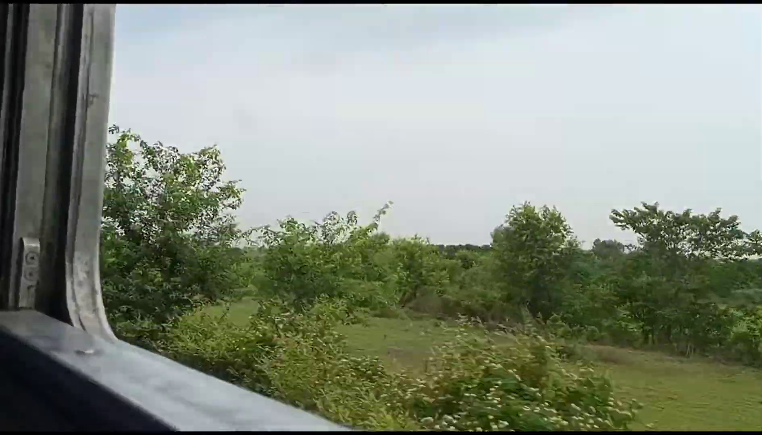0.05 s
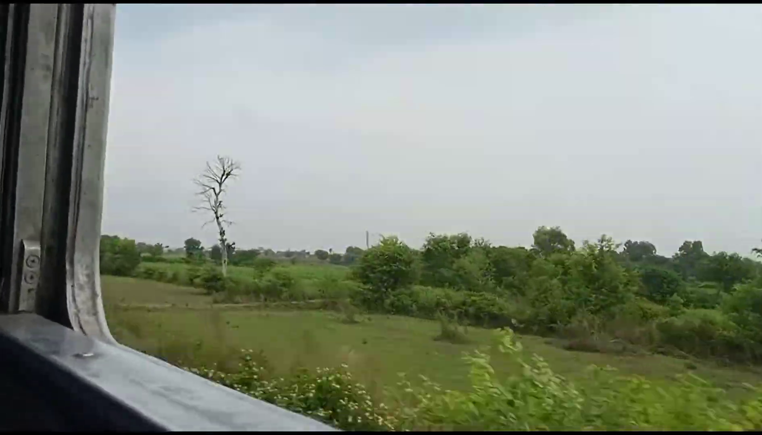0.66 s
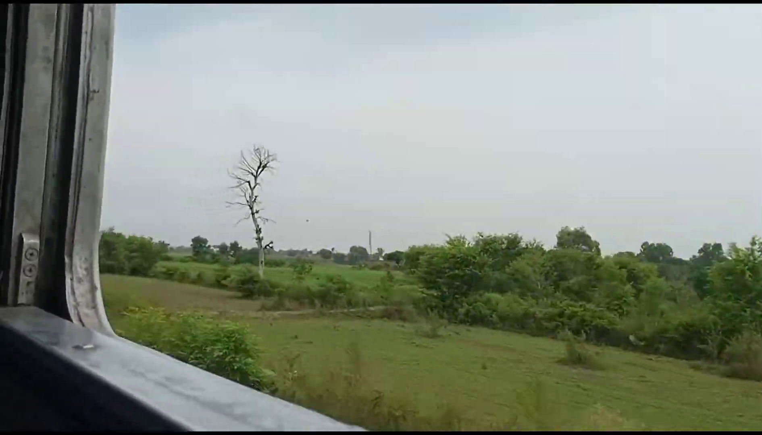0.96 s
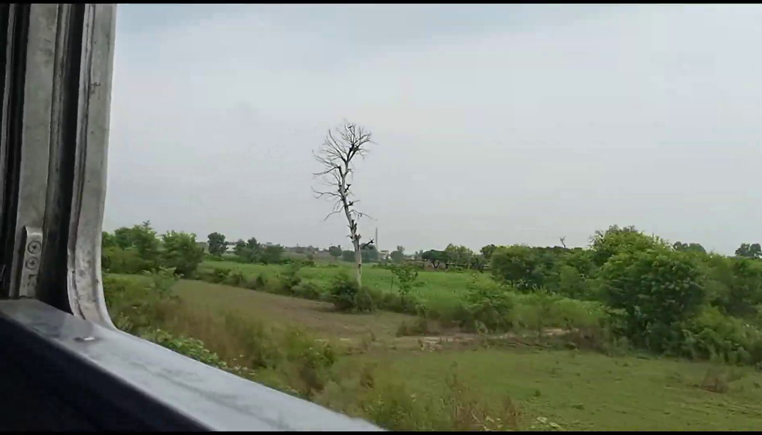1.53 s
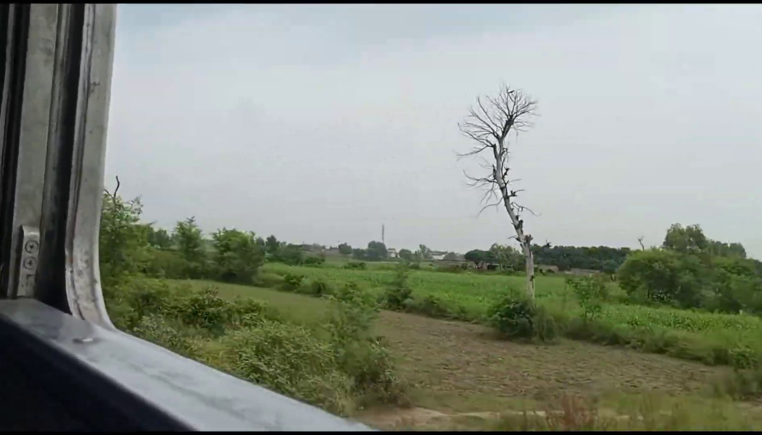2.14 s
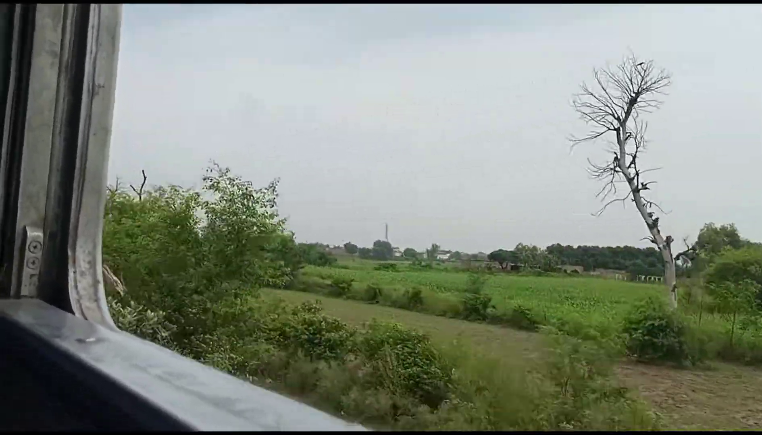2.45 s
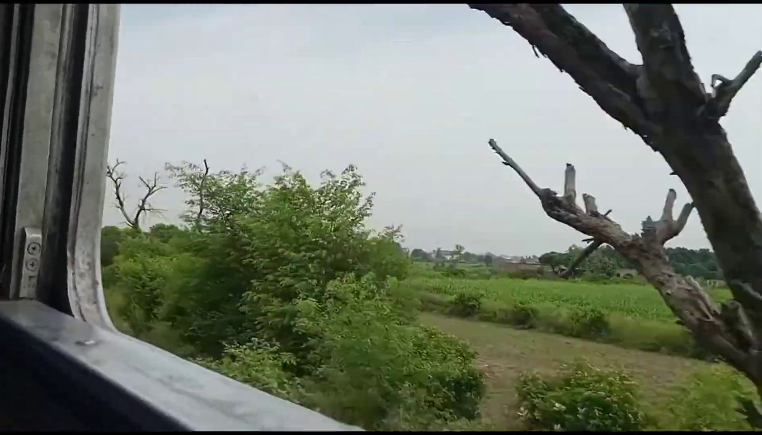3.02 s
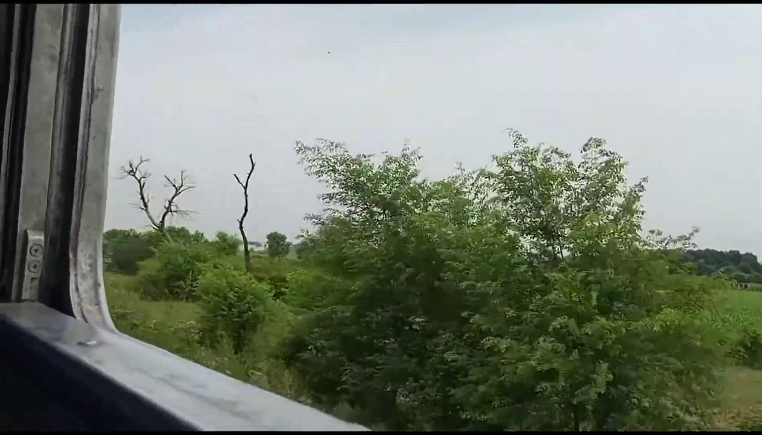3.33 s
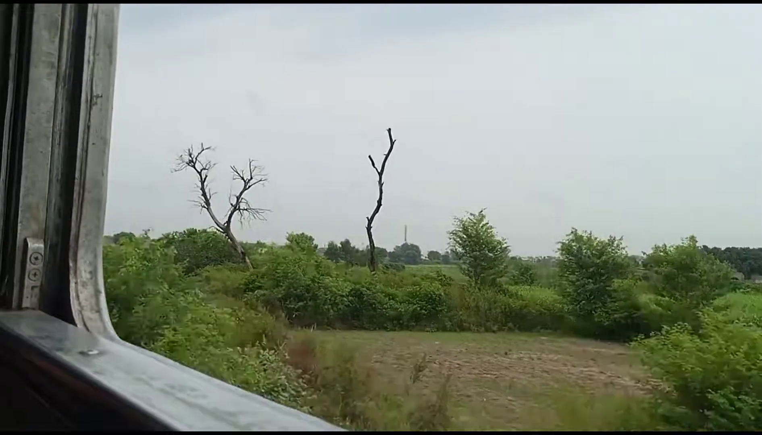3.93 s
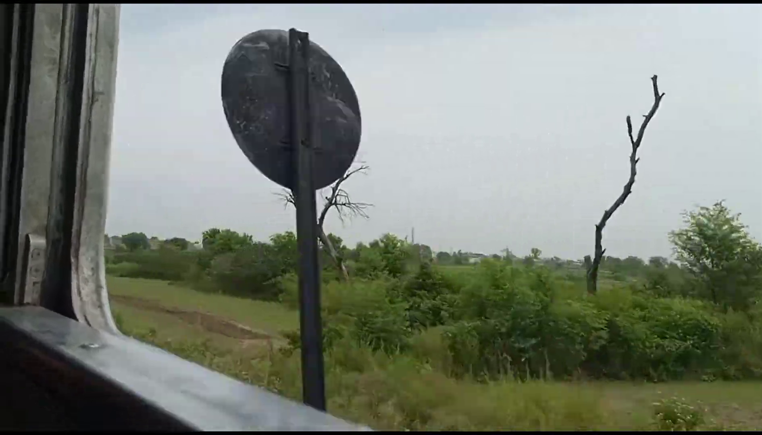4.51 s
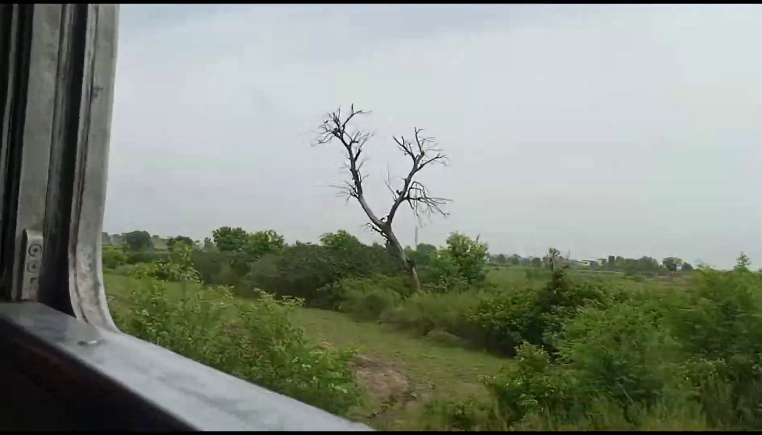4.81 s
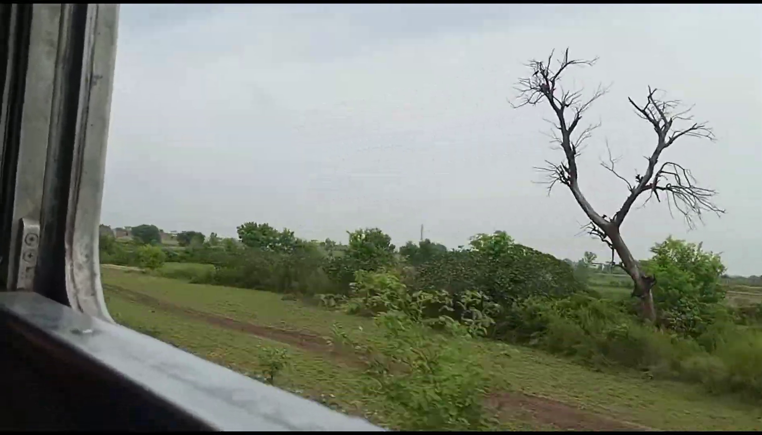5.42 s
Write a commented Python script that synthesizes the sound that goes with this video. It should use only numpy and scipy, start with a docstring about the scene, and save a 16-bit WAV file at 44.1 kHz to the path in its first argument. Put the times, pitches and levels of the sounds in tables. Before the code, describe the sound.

Loud gusty wind buffets the microphone at an open window of a moving train, over carriage rumble and hissing, rattling wheels.

```python
"""Gusts of wind buffet a microphone just inside the open window of a moving passenger train.
Under them the carriage rumbles and the wheels hiss and ring on the rails, with rattles, one scrape and
a few faint squeaks. Air rushes along the frame and falls slack between gusts; the hardest eddies choke
the microphone for a few milliseconds, then slap it. Gain control ducks the hiss under the gusts,
and a limiter holds the peaks."""
import sys
import numpy as np
from scipy import signal
from scipy.fft import rfft, irfft, next_fast_len
from scipy.io import wavfile
from scipy.ndimage import uniform_filter1d, minimum_filter1d

SR = 44100
rng = np.random.default_rng(int(sys.argv[2]) if len(sys.argv) > 2 else 0)


def put_to_file(sound):
    """Save the sound as 16-bit audio at rate SR, in the file named by the first command-line argument."""
    columns = np.atleast_2d(sound).T  # one column per channel
    safe = np.clip(columns, -1, 1)
    whole_steps = np.round(safe * 32767)
    wavfile.write(sys.argv[1], SR, whole_steps.astype(np.int16))


N = 245087
T = np.arange(N) / SR
FFT_SIZE = next_fast_len(N, real=True)
HZ = np.fft.rfftfreq(FFT_SIZE, 1 / SR)


def amp(db):
    """dB to gain."""
    return 10 ** (np.asarray(db) / 20)


def unit(x):
    """Scale to rms 1."""
    return x / np.sqrt(np.mean(x ** 2) + 1e-20)


def curve(rows):
    """(t, level) rows interpolated to every sample."""
    return np.interp(T, *np.transpose(rows))


def spectrum(rows):
    """(f, level) rows interpolated over log frequency, in dB."""
    hz, db = np.transpose(rows)
    return np.interp(np.log(HZ + 1), np.log(hz), db)


def resonance(hz, width_hz):
    """Peak of height 1 over frequency; full width at half height."""
    return 1 / (1 + (2 * (HZ - hz) / width_hz) ** 2)


def filtered(x, response):
    """Zero-phase filter, one gain per FFT bin."""
    return irfft(rfft(x, FFT_SIZE) * response, FFT_SIZE)[:N]


def noise(spectrum_db):
    """Coloured noise, rms 1."""
    return unit(filtered(rng.standard_normal(FFT_SIZE), amp(spectrum_db)))


def flutter(slow_hz, fast_hz):
    """Random wavering between two rates, rms 1."""
    return noise(-10 * np.log10((1 + (slow_hz / (HZ + .01)) ** 4) * (1 + (HZ / fast_hz) ** 4)))


def swell(t_s, length_s):
    """Gaussian bell of height 1 at t_s; length_s is two sigma."""
    return np.exp(-2 * ((T - t_s) / length_s) ** 2) * (abs(T - t_s) < 2 * length_s)


# Slow swell of the rumble: t/s, level/dB
RUMBLE_LEVEL = [(0, -17), (0.25, -17), (0.45, -16), (0.62, -15), (0.92, -14.5), (1.02, -14), (1.13, -18.5),
                (1.22, -15), (1.55, -15.5), (1.9, -14.5), (2.1, -15), (2.18, -11), (2.3, -17), (2.45, -16),
                (2.66, -13.5), (2.92, -17.5), (3.12, -17), (3.32, -15), (3.5, -19.5), (3.65, -16.5),
                (4.15, -17), (4.43, -18), (4.52, -13), (4.85, -17.5), (5.1, -14.5), (5.35, -17.5),
                (5.56, -18.5)]
# Rumble spectrum: f/Hz, level/dB
RUMBLE_SPECTRUM = [(15, -35), (30, -23), (50, -10), (75, -0.5), (100, -0.5), (130, -2), (200, -6.5),
                   (320, -17), (600, -24.5), (900, -27), (1250, -41.5), (2500, -88)]
def carriage(boom_hz=97, boom_width_hz=18, boom_db=-29, trim_db=-1):
    """Coach and window air rumble; the body booms at one resonance."""
    boom = noise(20 * np.log10(resonance(boom_hz, boom_width_hz)))
    rumble = amp(curve(RUMBLE_LEVEL) + trim_db) * noise(spectrum(RUMBLE_SPECTRUM))
    return rumble + amp(boom_db) * boom


# Swell of the rolling hiss: t/s, level/dB
ROLL_LEVEL = [(0, -43), (0.2, -43.5), (0.3, -48), (0.5, -51), (0.6, -46.5), (0.88, -45), (1.02, -48),
              (1.09, -41), (1.23, -43.5), (1.58, -42.5), (1.65, -46), (1.8, -43.5), (2.12, -44.5),
              (2.2, -43), (2.47, -42.5), (2.53, -45.5), (2.6, -44.5), (2.65, -47.5), (2.7, -41.5),
              (2.84, -47), (2.93, -41.5), (3.0, -40.5), (3.08, -47), (3.2, -41), (3.43, -46), (3.5, -48.5),
              (3.62, -46.5), (3.71, -45.5), (3.85, -46), (3.95, -47.5), (4.17, -47), (4.23, -41.5),
              (4.4, -39.5), (4.48, -44.5), (4.66, -48), (4.72, -49), (4.84, -41), (4.97, -43), (5.08, -46),
              (5.23, -43), (5.42, -40.5), (5.56, -43.5)]
# Rolling hiss spectrum: f/Hz, level/dB
HISS_SPECTRUM = [(300, -12.5), (900, 7), (1230, -11), (1440, 3.5), (1700, -2), (2300, 0), (2800, 3.5),
                 (3250, -1), (3600, -5.5), (4150, -14.5), (6250, -17.5), (6900, -30.5), (7600, -34.5),
                 (8200, -38.5), (16000, -55.5)]
# Wheel and rail resonances: f/Hz, width/Hz, boost/dB
STEEL_MODES = [(1857, 45, 5), (2040, 90, 5), (2420, 50, 3), (2740, 100, 2), (3010, 110, 5), (5935, 80, 6)]
# Running gear rattles: t/s, level/dB, length/s
GEAR_RATTLES = [(0.086, -41.5, 0.03), (0.179, -42, 0.017), (0.4, -46.5, 0.018), (1.099, -50, 0.026),
                (1.282, -45.5, 0.016), (1.883, -45.5, 0.034), (2.022, -41.5, 0.062), (2.298, -44.5, 0.039),
                (2.766, -42.5, 0.022), (2.878, -38.5, 0.019), (3.36, -38.5, 0.058), (3.555, -41, 0.063),
                (4.09, -43.5, 0.039), (4.321, -36.5, 0.016), (4.356, -38.5, 0.037), (4.449, -40, 0.019),
                (4.529, -40, 0.027), (4.62, -39, 0.026), (4.761, -39, 0.045), (4.897, -35.5, 0.032),
                (5.018, -39.5, 0.025), (5.183, -37.5, 0.026), (5.297, -38, 0.048), (5.406, -42, 0.042)]
# Treble fizz spectrum: f/Hz, level/dB
FIZZ_SPECTRUM = [(2000, -20.5), (4500, -1.5), (7500, -0.5), (8500, -8), (10500, -4), (13500, -23),
                 (15000, 2), (16000, -14)]
def wheels(trim_db=1.02, surge_db=1.0, flicker_db=1.1, chatter_db=3, fizz_db=-74, fizz_exponent=1.2):
    """Rolling hiss and rattles, coloured by ringing steel; a fine fizz swells faster than the hiss."""
    modes_db = sum(db * resonance(hz, width_hz) for hz, width_hz, db in STEEL_MODES)
    waver = unit(amp(surge_db * flutter(3.2, 18) + flicker_db * flutter(2.2, 60)))
    roll = amp(curve(ROLL_LEVEL) + trim_db) * waver
    rattle = sum(amp(db) * swell(t_s, length_s) for t_s, db, length_s in GEAR_RATTLES)
    chatter = unit(amp(chatter_db * flutter(60, 252)))
    envelope = np.hypot(roll, rattle * chatter)
    fizz_envelope = unit(envelope ** fizz_exponent * amp(flutter(4, 25)))
    hiss = envelope * noise(spectrum(HISS_SPECTRUM) + modes_db)
    return hiss + amp(fizz_db) * fizz_envelope * noise(spectrum(FIZZ_SPECTRUM))


# Wheel squeaks: t/s, level/dB, length/s, f/Hz
WHEEL_SQUEAKS = [(0.951, -52, 0.024, 2960), (1.113, -55, 0.02, 2960), (1.417, -56, 0.012, 3020),
                 (1.581, -54, 0.0098, 2970), (1.883, -50, 0.014, 3030), (2.39, -59, 0.016, 2950),
                 (3.283, -53.5, 0.016, 2920), (4.382, -58, 0.043, 3030), (5.186, -52, 0.011, 3060)]
def squeaks(pitch_waver=0.013, fundamental_db=5, roughness=0.74):
    """A wheel briefly sings one scratchy, unsteady note and its octave."""
    warped_s = np.cumsum(1 + pitch_waver * flutter(40.3, 300)) / SR
    out = np.zeros(N)
    for t_s, db, length_s, hz in WHEEL_SQUEAKS:
        phase = 2 * np.pi * hz * warped_s
        tone = np.sqrt(2) * (amp(fundamental_db) * np.sin(phase) + np.sin(2 * phase))
        out += amp(db) * swell(t_s, length_s) * tone
    return out * unit(1 + roughness * flutter(30, 200))


# Modes of the scraped wheel: f/Hz, width/Hz, level/dB
WHEEL_MODES = [(1560, 150, -4), (2070, 380, -1.5), (2600, 400, -9), (2990, 170, 3.5), (3350, 940, -10)]
def scrape(t_s=0.946, level_db=-37, length_s=0.027, rough_db=1.5):
    """A flange grinds on the rail once, ringing several wheel modes."""
    power = sum((amp(db) * resonance(hz, width_hz)) ** 2 for hz, width_hz, db in WHEEL_MODES)
    envelope = amp(level_db + rough_db * flutter(40, 150)) * swell(t_s, length_s)
    return envelope * noise(10 * np.log10(power))


# Faint ticks: t/s, level/dB
HIGH_TICKS = [(0.4455, -52), (0.6052, -64), (0.9659, -59), (1.0053, -62), (1.2053, -53), (1.3051, -56),
              (1.325, -58), (1.7655, -52), (2.1053, -56), (2.6051, -58), (2.7857, -61), (2.8855, -57),
              (2.9055, -55), (2.9653, -63), (3.4053, -65), (3.4856, -62), (3.6059, -60), (3.745, -56),
              (3.8259, -48), (3.8852, -59), (3.9052, -64), (3.9451, -58), (4.0853, -64), (4.1052, -63),
              (4.1456, -64), (4.5253, -62), (4.646, -64), (4.9852, -61), (5.1853, -56), (5.2656, -57)]
def ticks(ring_hz=12100, ring_s=0.0005, snap_s=0.00009, snap_db=-0.5, trim_db=-1.5):
    """Tiny high ticks: a broad snap inside about 1 ms of ringing."""
    out = np.zeros(N)
    for t_s, db in HIGH_TICKS:
        near = abs(T - t_s) < 10 * ring_s
        offset_s = abs(T[near] - t_s)
        envelope = np.exp(-offset_s / ring_s) + amp(snap_db) * np.exp(-offset_s / snap_s)
        out[near] += amp(db + trim_db) * envelope * np.sqrt(2) * np.cos(2 * np.pi * ring_hz * offset_s)
    return out


# Rushes along the frame: t/s, level/dB, length/s
FRAME_RUSHES = [(0.03, -56, 0.038), (0.097, -58, .025), (0.945, -59, .035), (1.523, -52.5, .032),
                (1.578, -60, .016), (1.842, -58, .025), (1.975, -56, .012), (2.03, -59, 0.045),
                (2.268, -62, .03), (4.905, -57, .03), (5.163, -56, .01), (5.188, -55, .016),
                (5.268, -57, .008), (5.292, -52, .018), (5.32, -56, .013), (5.54, -57, .03)]
# Rush spectrum: f/Hz, level/dB
RUSH_SPECTRUM = [(1000, -20), (3000, 1), (4500, 2), (6200, -5), (7200, -12), (8500, -17.5), (11000, -14.5),
                 (13500, -27), (15000, -15.5), (16000, -20.5)]
def rushes(grit_db=4, crackle_db=-83, grains_per_s=120, spread_db=5, crackle_hz=10500, half_band_hz=3000):
    """Air tears along the window frame in gritty swells; a fine crackle follows the airflow."""
    envelope = sum(amp(db) * swell(t_s, length_s) for t_s, db, length_s in FRAME_RUSHES)
    grit = unit(amp(grit_db * np.tanh(flutter(81, 900))))
    onsets = rng.random(N) < grains_per_s / SR
    grains = onsets * amp(spread_db * np.minimum(rng.exponential(1, N), 4))
    band = 1 / (1 + ((HZ - crackle_hz) / half_band_hz) ** 4)
    crackle = unit(filtered(grains * amp(curve(FLOW_LEVEL)), band))
    return envelope * grit * noise(spectrum(RUSH_SPECTRUM)) + amp(crackle_db) * crackle


# Lulls in the airflow: t/s, full depth/dB, length/s
AIR_LULLS = [(0.313, -11, 0.019), (0.477, -10, .012), (0.537, -2.5, 0.016), (0.763, -7, 0.02),
             (0.862, -7, 0.01), (1.1, -3, 0.011), (1.27, -12, 0.022), (1.513, -9, 0.013),
             (1.584, -12, 0.011), (1.978, -0.5, 0.066), (2.176, -12, .025), (2.42, -1, .03),
             (2.865, -9, 0.017), (2.949, -5, 0.01), (3.195, -7, 0.01), (3.247, -0.5, .02),
             (3.362, -3.5, 0.042), (3.528, -15, 0.0092), (3.673, -8.5, 0.02), (3.798, -3, 0.024),
             (4.028, -8.5, 0.018), (4.255, -14.5, 0.018), (4.308, -4.5, .014), (4.4, -2.5, .04),
             (4.511, -5, 0.014), (5.12, -7, 0.011)]
def slack(share):
    """Gain dips as the air falls slack; share scales the depth in dB."""
    return amp(share * sum(db * swell(t_s, length_s) for t_s, db, length_s in AIR_LULLS))


# Airflow between gusts: t/s, level/dB
FLOW_LEVEL = [(0, -22.5), (0.6, -25.5), (0.9, -21), (1.13, -27), (1.42, -20), (1.6, -22), (1.8, -24.5),
              (2.1, -24), (2.45, -24), (2.7, -24.5), (2.86, -22), (3.15, -21.5), (3.55, -24.5), (3.9, -24),
              (4.1, -21), (4.3, -27), (4.75, -24.5), (5.3, -24.5), (5.56, -23.5)]
# Buffeting spectrum: f/Hz, level/dB
BUFFET_SPECTRUM = [(30, -35), (70, -19), (140, 0.5), (250, 0), (400, -5.5), (600, -13), (850, -20),
                   (1100, -35), (1500, -41.5), (2500, -55), (4500, -68.5), (9000, -98.5)]
# Gusts: t/s, level/dB, length/s, vortex f/Hz
WIND_GUSTS = [(0.253, -19, 0.013, 442), (0.273, -13, 0.017, 240), (0.295, -18.5, 0.006, 320),
              (0.347, -12.5, 0.024, 329), (0.422, -14, 0.035, 327.4), (0.501, -18, 0.024, 255.6),
              (0.567, -17, 0.023, 300), (0.624, -19.5, 0.008, 260), (0.639, -14, 0.0094, 130),
              (0.668, -15, 0.022, 313), (0.742, -18, 0.027, 323.6), (1.661, -15, 0.012, 254),
              (1.912, -20.5, 0.016, 264.6), (2.083, -12, 0.0048, 168), (2.29, -16, 0.011, 278),
              (2.568, -20, 0.025, 350), (2.652, -15.5, 0.021, 226), (2.684, -14, 0.014, 403),
              (2.726, -14.5, 0.016, 285.6), (2.911, -15, 0.011, 292.3), (2.991, -16, 0.015, 260),
              (3.058, -18, 0.025, 238.4), (3.095, -20.5, 0.042, 380), (3.167, -17, 0.024, 170),
              (3.423, -19.5, 0.034, 262.6), (3.481, -16.5, 0.02, 238.6), (3.648, -15.5, 0.023, 290),
              (3.702, -18, 0.0067, 266.6), (3.745, -15.5, 0.014, 250), (3.824, -19.5, 0.0057, 260),
              (3.894, -17.5, 0.034, 400), (3.925, -7.5, 0.012, 242), (3.961, -26, 0.031, 390),
              (4.117, -16.5, 0.013, 329.4), (4.156, -17, 0.011, 162), (4.195, -10, 0.012, 270.7),
              (4.244, -15, 0.009, 154), (4.284, -23, 0.0097, 280), (4.487, -18, 0.0064, 260),
              (4.614, -17.5, 0.035, 299.5), (4.659, -12.5, 0.0057, 177), (4.798, -17, 0.008, 280),
              (5.068, -14.5, 0.03, 338), (5.134, -10, 0.0057, 146), (5.213, -14, 0.0056, 295.3),
              (5.3, -20, 0.043, 346.4), (5.346, -12.5, 0.013, 294.3)]
def wind(trim_db=2.5, gust_trim_db=0.5, lump_db=3.5, burst_db=3.0, wander_db=1, split_hz=450):
    """Eddies hit the microphone in lumps, more evenly in gusts; fine turbulence bursts more sharply."""
    eddies = flutter(4.7, 54.6)
    air = noise(spectrum(BUFFET_SPECTRUM))
    coarse = filtered(air, 1 / (1 + (HZ / split_hz) ** 2))
    fine = (air - coarse) * unit(amp(burst_db * np.tanh(flutter(30, 157)) + eddies))
    lumps = unit(amp(lump_db * 2 * np.tanh(eddies / 2)))
    flow = amp(curve(FLOW_LEVEL) + wander_db * flutter(4.6, 8.7)) * lumps
    gusts = sum(amp(db + gust_trim_db) * swell(t_s, length_s) for t_s, db, length_s, _ in WIND_GUSTS)
    return amp(trim_db) * np.hypot(flow, gusts) * (coarse + fine)


def vortices(flap_s=0.0098, pitch_waver=0.027, trim_db=1.5):
    """At each gust peak the frame sheds vortices: a few cycles on a rough, drifting pitch."""
    warped_s = np.cumsum(1 + pitch_waver * flutter(21, 121)) / SR
    out = np.zeros(N)
    for t_s, db, _, hz in WIND_GUSTS:
        tone = np.sqrt(2) * np.sin(2 * np.pi * (hz * warped_s + rng.random()))
        out += amp(db + trim_db) * swell(t_s, flap_s) * tone
    return out


# Eddy impacts: t/s, level/dB
EDDY_SLAPS = [(0.433, -12.5), (0.4456, -10), (0.577, -16), (0.602, -12.5), (0.72, -10), (0.795, -24),
              (0.892, -13), (1.012, -13), (1.302, -12.5), (1.391, -15), (1.406, -16), (1.687, -20),
              (1.862, -15.5), (2.552, -11.5), (3.058, -19), (3.88, -20.5), (3.944, -17), (3.954, -22),
              (4.579, -20), (4.68, -19), (4.795, -28), (5.287, -10.5), (5.341, -14.5), (5.391, -13.5)]
def slaps(rise_s=0.00027, decay_s=0.01, burst_db=-2.5, tilt_db=8, pivot_hz=520,
          spike_db=8, spike_s=0.00033, spike_cutoff_hz=1250):
    """The hardest eddies slap the microphone: a pressure spike and a short, bright burst."""
    envelope, spikes = np.zeros(N), np.zeros(N)
    for t_s, db in EDDY_SLAPS:
        near = abs(T - t_s) < 10 * decay_s
        age_s = np.maximum(T[near] - t_s, 0)
        attack = 1 - np.exp(-(age_s / rise_s) ** 2)
        envelope[near] += amp(db + burst_db) * attack * np.exp(-age_s / decay_s)
        widths = age_s / spike_s
        spikes[near] += amp(db + spike_db) * widths * (2 - widths) * np.exp(-widths)
    spikes = signal.sosfilt(signal.butter(3, spike_cutoff_hz, fs=SR, output="sos"), spikes)
    bright_db = spectrum(BUFFET_SPECTRUM) + tilt_db * np.tanh(np.log((HZ + 1) / pivot_hz))
    return spikes + envelope * noise(bright_db)


def scene():
    """Train and wind at the microphone, mono."""
    rumble = carriage() * slack(share=0.45)
    buffeting = wind() * slack(share=0.96) + vortices() + slaps()
    return (rumble + buffeting + rushes() + wheels() + scrape() + squeaks())[None]


def peak_hold(db, release_db_per_s):
    """Instant attack, linear release in dB."""
    fall_db = release_db_per_s * T
    return np.maximum.accumulate(db + fall_db) - fall_db


def gain_control(x, threshold_db=-15, slope=0.27, detector_hz=150, detector_release_db_per_s=220):
    """Loud buffeting turns everything down, so the hiss ducks under each gust."""
    buffeting = filtered(x, HZ ** 2 / (HZ ** 2 + detector_hz ** 2))
    power = uniform_filter1d(buffeting ** 2, size=260)
    over_db = 10 * np.log10(1 + abs(power) / amp(threshold_db) ** 2)
    held_db = peak_hold(over_db, detector_release_db_per_s)
    return x * amp(-slope * uniform_filter1d(held_db, size=90))


# Microphone chokes: release t/s, length/s, depth/dB
MIC_CHOKES = [(0.117, 0.0018, -23.5), (0.3245, 0.004, -11), (0.431, 0.0049, -18), (0.495, 0.0053, -10),
              (0.572, 0.0055, -18), (0.6295, 0.0041, -26), (0.645, 0.0069, -14), (0.719, 0.0065, -26),
              (0.793, 0.0085, -27), (0.886, 0.0055, -21.5), (1.023, 0.0061, -24), (1.303, 0.0024, -12),
              (1.39, 0.0062, -16), (1.474, .012, -25), (1.6865, 0.0043, -35), (1.781, 0.0035, -11),
              (1.9885, 0.0062, -12), (2.4372, 0.0027, -26), (2.548, 0.0048, -14), (2.708, 0.004, -32),
              (2.888, 0.0028, -4), (2.956, 0.0034, -14), (3.055, 0.0057, -15), (3.2527, 0.01, -9),
              (3.334, 0.0066, -17), (3.621, 0.0021, -13), (3.8685, 0.0062, -16.5), (3.952, 0.0046, -18),
              (4.1178, 0.003, -29), (4.574, 0.012, -9.5), (4.642, 0.0039, -16), (4.649, 0.0048, -25),
              (4.679, 0.0021, -18), (4.7205, 0.0019, -13), (4.792, 0.0062, -14), (4.9607, 0.0022, -12),
              (5.238, 0.0045, -16), (5.2628, 0.0036, -20), (5.335, 0.0066, -10), (5.389, 0.0045, -2),
              (5.471, 0.0031, -17)]
def choke(x, stutters_per_s=9, stutter_s=0.0014, stutter_db=-12, heave_hz=110, heave_db=-3):
    """Wind pins the microphone against its stop, leaving a dull heave; brief random stutters join in."""
    ends_s = T[rng.random(N) < stutters_per_s / SR]
    stutters = [(end_s, stutter_s * (.5 + rng.random()), stutter_db) for end_s in ends_s]
    gain = np.ones(N)
    for end_s, length_s, db in [*MIC_CHOKES, *stutters]:
        gain[max(round((end_s - length_s) * SR), 0):round(end_s * SR)] = amp(db)
    gain = uniform_filter1d(uniform_filter1d(gain, size=31), size=31)  # ~1 ms edges
    heave = amp(heave_db) * filtered(x, 1 / (1 + (HZ / heave_hz) ** 4))
    return gain * x + (1 - gain) * heave


def limiter(x, knee_db=-8, knee_width_db=5, release_db_per_s=260):
    """Soft-knee peak limiter with a short look-ahead."""
    excess_db = np.maximum(20 * np.log10(abs(x) + 1e-9) - knee_db, 0)
    cut_db = excess_db - knee_width_db * np.tanh(excess_db / knee_width_db)
    gain_db = minimum_filter1d(-peak_hold(cut_db, release_db_per_s), size=121)
    return x * amp(uniform_filter1d(uniform_filter1d(gain_db, size=61), size=61))


def record(dry, makeup_db=0.15, low_cut_hz=32, high_cut_hz=15800):
    """Gain control, choke, limiter, added ticks, end fades, band limits."""
    x = choke(gain_control(dry[0]))
    x = limiter(amp(makeup_db) * x) + ticks()
    x = x * signal.windows.tukey(N, .001)
    x = signal.sosfilt(signal.butter(2, low_cut_hz, "highpass", fs=SR, output="sos"), x)
    lowpass = signal.firwin(511, high_cut_hz, window=("kaiser", 9), fs=SR)
    return signal.oaconvolve(x, lowpass, "same")[None]


dry = scene()
out = record(dry)
put_to_file(out)
```